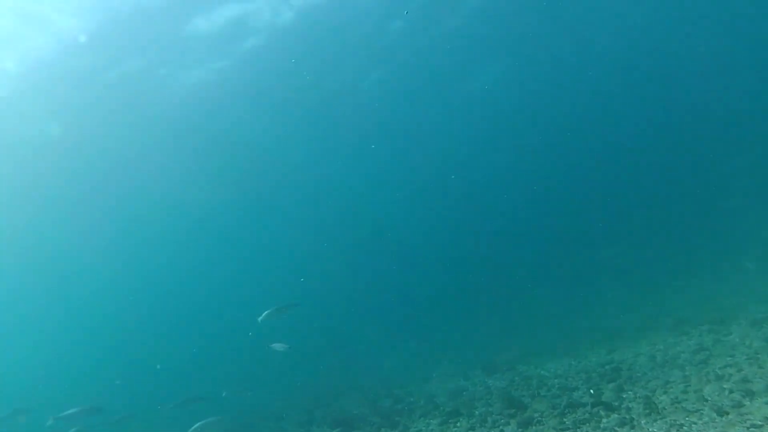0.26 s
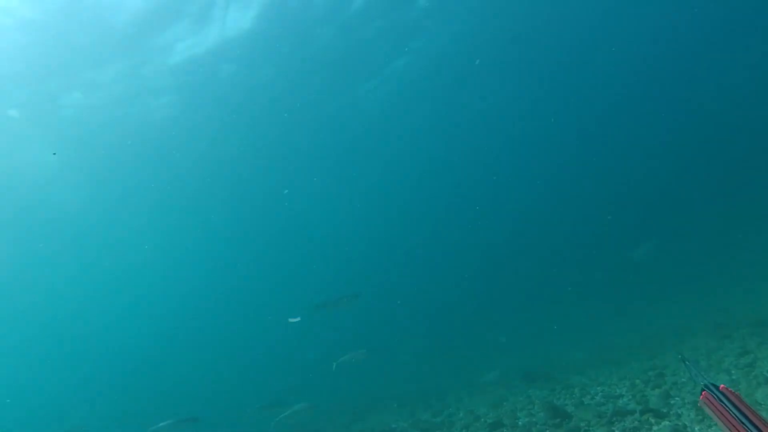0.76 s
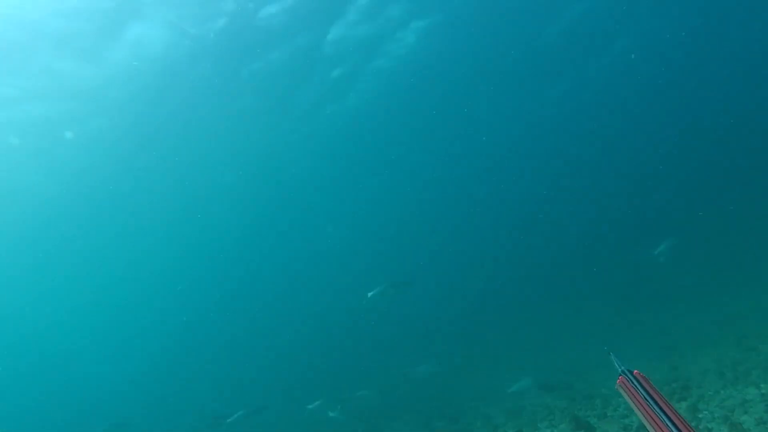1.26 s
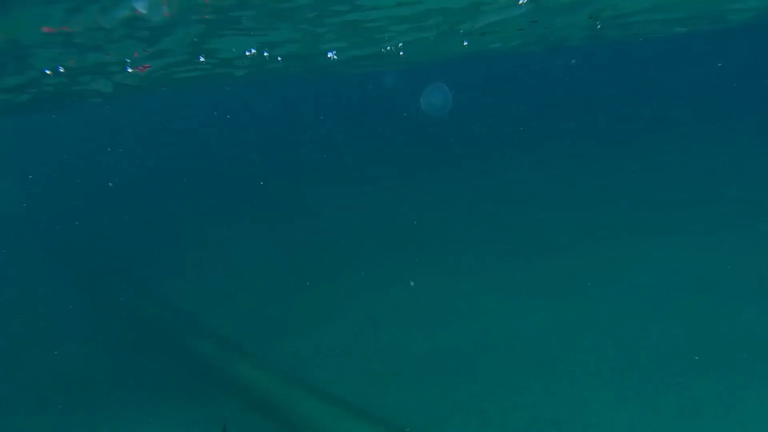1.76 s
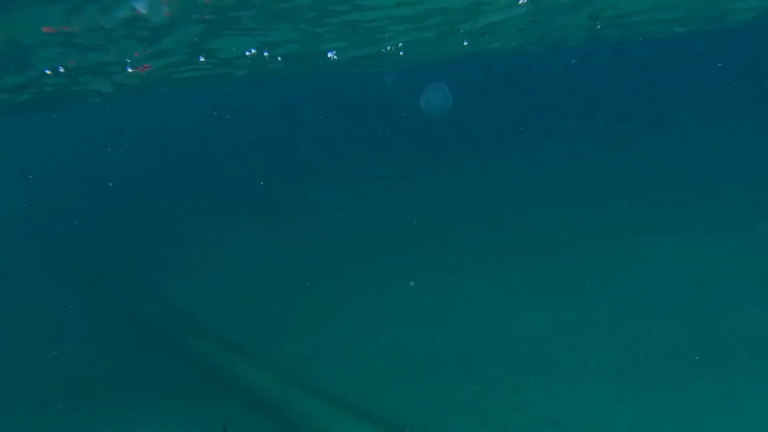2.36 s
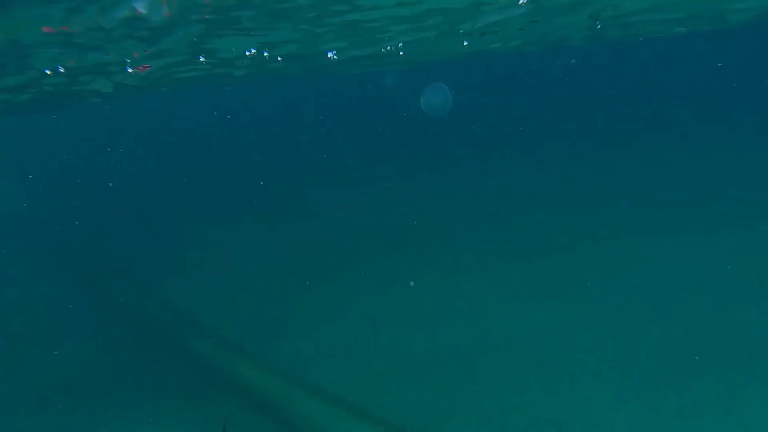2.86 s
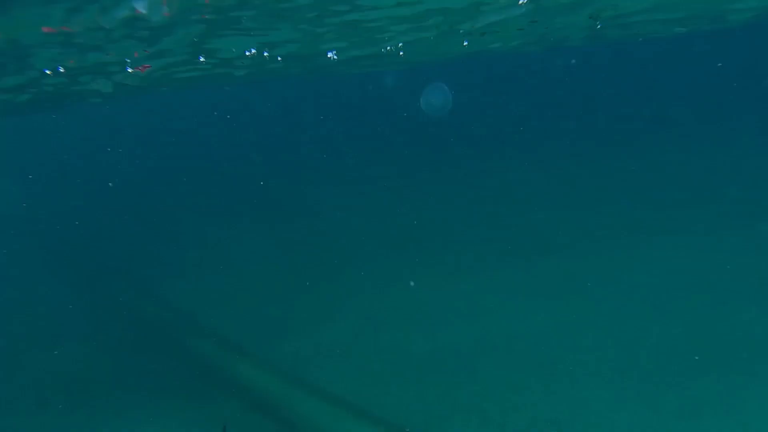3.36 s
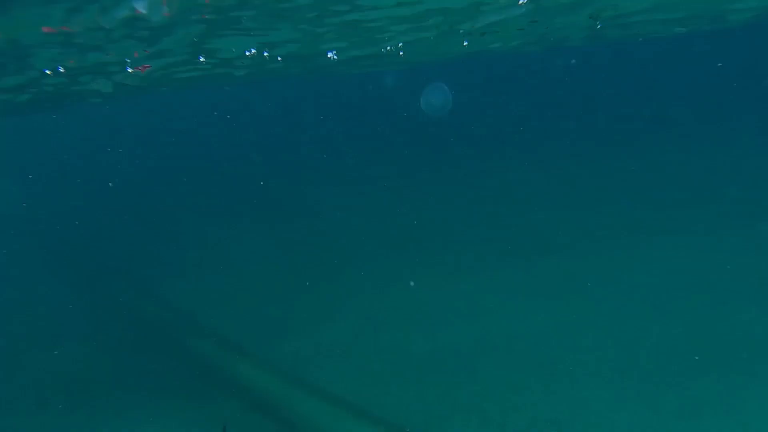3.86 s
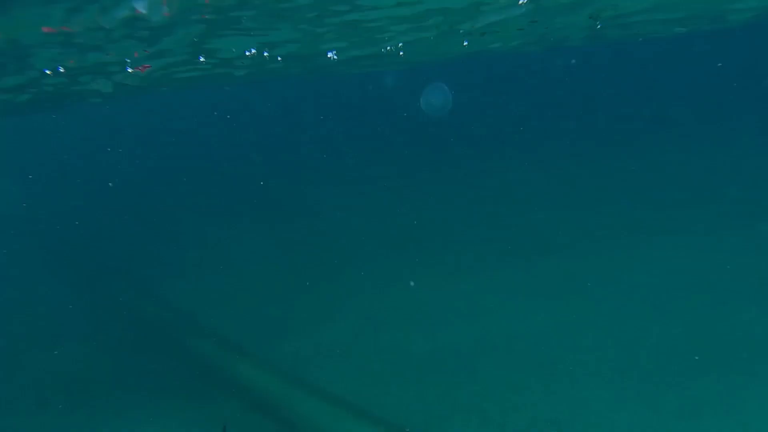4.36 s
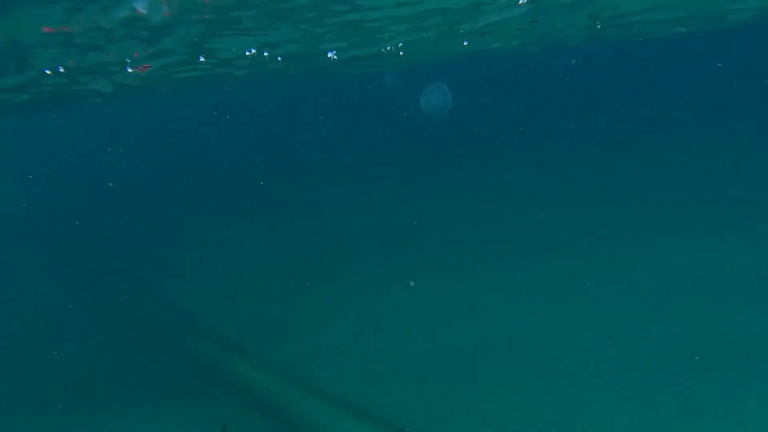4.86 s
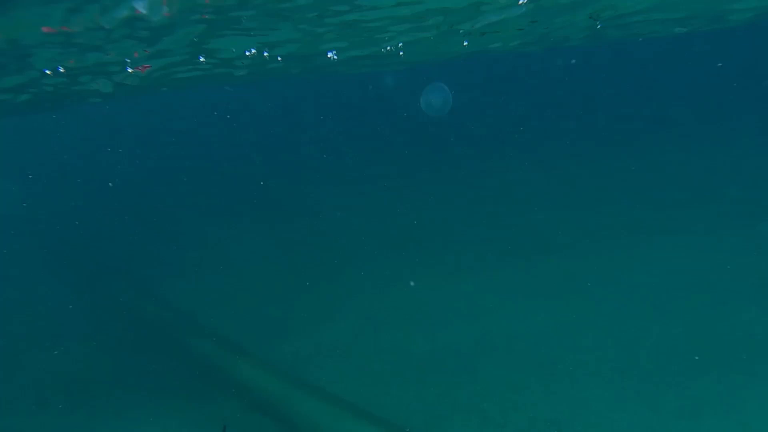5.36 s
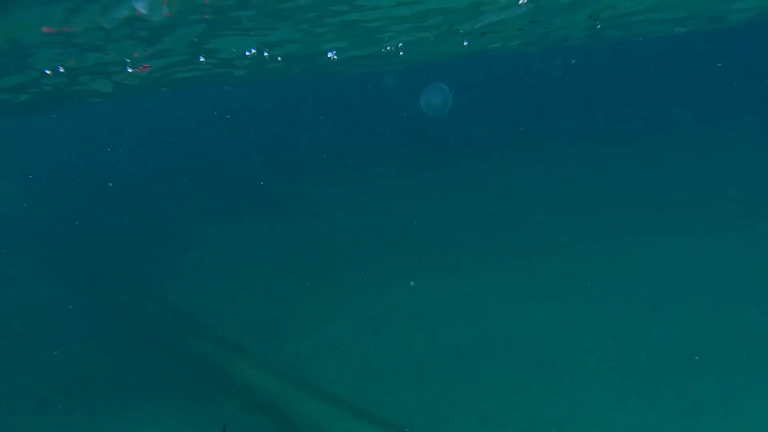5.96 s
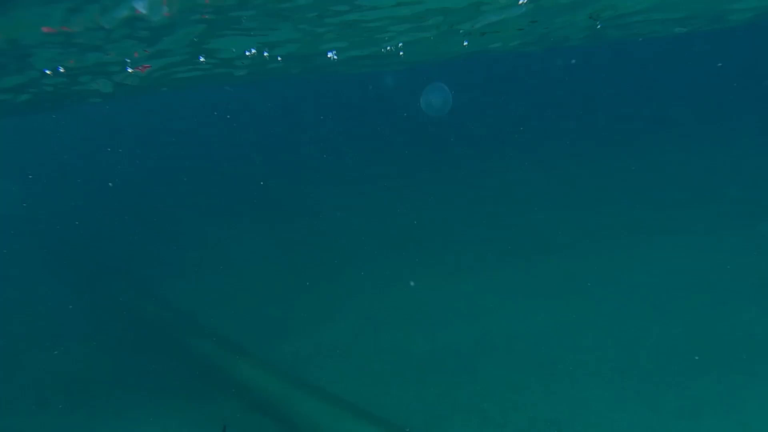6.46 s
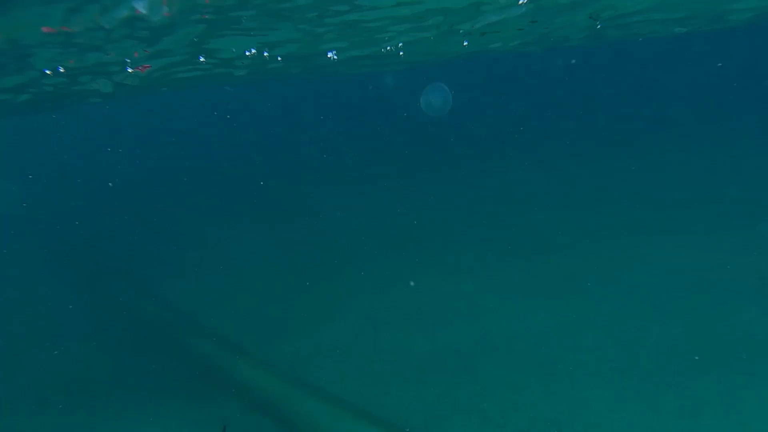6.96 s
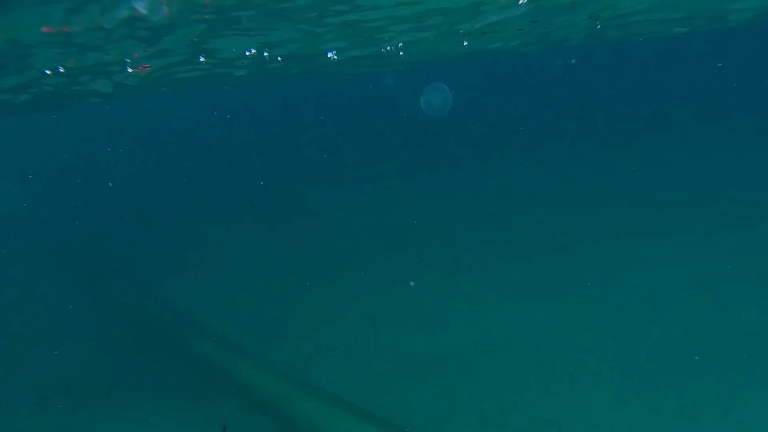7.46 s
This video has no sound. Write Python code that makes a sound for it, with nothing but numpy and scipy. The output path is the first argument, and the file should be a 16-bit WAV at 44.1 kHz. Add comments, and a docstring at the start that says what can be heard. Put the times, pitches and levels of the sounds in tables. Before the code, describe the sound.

Underwater, a microphone in a sealed housing picks up the continuous ringing drone of far-off boat traffic over a deep, wavering water rumble. After a split-second gap near the start, the drone carries on unchanged. Small, sharp shrimp clicks are scattered throughout, the loudest pair coming about two thirds of the way in. A very faint, high electronic whine sits behind everything.

```python
"""A sealed camera housing hangs under water while boats run far off. From the start, their propeller
roar rings the housing as a steady drone; engine hum and the surge of the water rumble below it,
snapping shrimp tick now and then, and the electronics whine faintly. At about 1.5 seconds the sound
dips to silence for an instant and comes back. The loudest snaps fall near 5 seconds, and the drone
carries on to the end."""
import sys
import numpy as np
from scipy import signal
from scipy.fft import rfft, irfft, next_fast_len
from scipy.io import wavfile
from scipy.ndimage import uniform_filter1d

SR = 44100
rng = np.random.default_rng(int(sys.argv[2]) if len(sys.argv) > 2 else 0)


def wrap_up_sound(samples):
    """Save the sound to the file named by the first command line argument, as 16-bit audio."""
    columns = np.atleast_2d(samples).T
    # keep every value between -1 and 1, then stretch to whole-number steps
    tamed = np.clip(columns, -1, 1)
    steps = np.round(tamed * 32767).astype(np.int16)
    wavfile.write(sys.argv[1], SR, steps)


N = 340011


def propellers():
    """Bubbles collapse at far propellers; their churning noise, with the crackle of snapping shrimp, makes the
    housing ring."""
    # The drone's slow drift. Each row: time in seconds, then the levels in dB of the low ring,
    # the middle ring, the shoulder just above it and the treble hiss.
    drift = [(0.0, -23, -24, -29.5, -50), (0.7, -23, -23, -28.5, -46.5), (1.4, -23.5, -22.5, -28.5, -47.5),
             (2.1, -24.5, -22.5, -29.5, -48), (2.7, -25, -23, -28.5, -47), (3.5, -24.5, -22.5, -29, -48),
             (3.9, -27, -23, -30.5, -50.5), (4.6, -24, -24.5, -32, -52), (5.1, -25.5, -25, -32, -49),
             (5.7, -23.5, -24, -34, -49.5), (6.4, -23.5, -24, -30, -49.5), (7.3, -24, -24, -27, -48.5),
             (7.71, -23, -23, -29.5, -49.5)]
    # Pitches at which the housing rings. Each row: pitch in Hz, width in Hz, relative level in dB.
    low_modes = [(271, 125, -32), (425.4, 49, -21.5), (484, 41, -22), (627, 56, -13.5), (711.4, 79.4, -0.5),
                 (785, 58, -8.5), (1034.5, 74, -9), (1107.4, 63, -7)]
    mid_modes = [(1351, 85, -13.5), (1476, 113, -10), (1664, 83, -3.5), (1737, 73, -1)]
    shoulder_modes = [(1855, 120, 1), (2060, 136, -4.5), (2218, 120, -12.5), (2386, 107, -10.5),
                      (2564, 75, -18), (2800, 42, -24)]
    high_modes = [(3178, 207, 3), (3330, 250, -40), (4020, 300, -38.5), (4478, 194, 2), (4750, 150, -4),
                  (5647, 300, 1.5), (6230, 380, 2.5), (7890, 1200, -11.5), (8980, 1200, -11.5),
                  (10370, 700, -17), (11400, 660, -10.5), (12500, 920, -13.5), (14200, 1400, -10.5),
                  (15500, 1400, -17)]
    # Brief swells of the middle ring. Each row: time in seconds, extra dB, half-length in seconds.
    bursts = [(1.019, 6, 0.016), (2.747, 6, 0.0056), (3.104, 6, 0.008), (4.12, 8.5, 0.0096),
              (5.278, 10, 0.0095), (5.386, 9.5, 0.0091), (6.6, 5.5, 0.012)]
    flutter_db, pops_per_s = 1.3, 180
    t = np.arange(N) / SR
    low_db, mid_db, shoulder_db, high_db = curves(drift)
    burst_db = sum(db * np.exp(-((t - s) / half_length) ** 2) for s, db, half_length in bursts)
    roar = rng.standard_normal(N) * undb(flutter_db * wander(per_s=25))
    pop_db = 11.5 + 3.5 * np.minimum(rng.exponential(size=N), 3)  # mostly small, a few large
    pops = (rng.random(N) < pops_per_s / SR) * undb(pop_db)
    pops *= undb(3.5 * wander(per_s=14))  # the crackle comes in flurries
    groups = ((roar, low_modes, 1.6, low_db),
              (roar, mid_modes, 1.6, mid_db + burst_db),
              (rng.standard_normal(N), shoulder_modes, 1.7, shoulder_db + burst_db / 2),
              (roar + pops * np.sign(roar), high_modes, 1.8, high_db))
    drone = np.zeros(N)
    for noise, modes, steepness, db in groups:
        fluttering = noise * undb(flutter_db * wander(per_s=14))  # each group also flutters alone
        drone += undb(db) * unit(ring(fluttering, modes, steepness))
    return drone


def rumble():
    """Engines hum through the water in a few narrow bands while the swell pushes on the housing."""
    # The rumble's slow drift. Each row: time in seconds, then the levels in dB of the hum below
    # 80 Hz, the hum above 80 Hz and the water's surge.
    drift = [(0.0, -30, -31, -27), (0.9, -33, -33.5, -23), (1.6, -36.5, -32, -28), (2.3, -32.5, -32, -21),
             (3.2, -32.5, -32.5, -19.5), (4.3, -33, -33, -17), (4.9, -36, -33.5, -27),
             (5.5, -34, -31.5, -19), (6.3, -34.5, -33.5, -20.5), (7.1, -36.5, -30, -20.5),
             (7.71, -33, -28.5, -16.5)]
    # How those three layers waver. Each row: typical swing in dB, changes per second.
    wavers = [(2.1, 11), (2.73, 11), (1.1, 6)]
    # The bands of each layer. Each row: pitch in Hz, width in Hz, relative level in dB.
    low_hum = [(27.7, 22, -7.5), (45, 12.5, 2), (63.8, 19, -1)]
    upper_hum = [(91.3, 16.7, -3), (102.5, 10.7, 1), (120.8, 11, -1), (152.3, 14, -14.5), (169, 37, -23.5)]
    surge = [(5, 5.6, 0), (11, 2.8, -4.5)]
    out = np.zeros(N)
    layers = zip(curves(drift), wavers, (low_hum, upper_hum, surge), (1.8, 1.9, 2.2))
    for db, (waver_db, per_s), bands, steepness in layers:
        # the noise wavers first, so the ringing smooths every change
        noise = undb(waver_db * wander(per_s)) * rng.standard_normal(N)
        out += undb(db) * unit(ring(noise, bands, steepness))
    return out


def shrimp():
    """Each shrimp snap is a sharp crack and a short hiss that ring four groups of pitches."""
    # The snaps. Each row: start in seconds, then the peak levels in dB of the low ring,
    # the middle tick, the upper tick and the bright crack.
    snaps = [(0.1267, -42, -45, -33, -31), (0.369, -45, -36, -21.5, -31), (0.3758, -55, -50, -36, -48),
             (0.3824, -55, -50, -37, -48), (0.7412, -35, -35, -31, -43), (1.112, -34, -36, -34, -39),
             (1.1779, -36, -32, -30, -31), (1.7931, -39, -34, -30, -38), (2.209, -39, -40, -34, -34),
             (2.2581, -37, -31, -38, -46), (2.4798, -50, -37, -34, -37), (2.4865, -38, -33, -28, -30),
             (4.5917, -39, -35, -31, -35), (4.7485, -11.5, -23.5, -36, -48), (4.9316, -47, -35, -40, -46),
             (5.0077, -14, -25, -28, -42), (5.0107, -19, -18, -23, -9.5), (5.2788, -37, -30, -29, -31),
             (5.4088, -50, -45, -31, -40), (5.5681, -51, -40, -34, -35), (6.1193, -55, -45, -31, -37),
             (6.1368, -38, -38, -36, -35), (6.222, -37, -38, -32, -36), (6.2258, -45, -57, -57, -26)]
    # One list for each of those four parts. Each row: pitch in Hz, width in Hz, relative level in dB.
    snap_modes = [
        [(2790, 160, 0), (2350, 500, -7), (3300, 500, -10)],
        [(3900, 700, -2), (4700, 700, 0)],
        [(5700, 600, -2), (6300, 700, 0)],
        [(8600, 1400, -22), (10900, 800, 0), (12500, 1400, -5), (15000, 1200, -13)],
    ]
    hiss_gain, hiss_decay_s = .1, .0008
    t = np.arange(SR // 20) / SR
    crack = t == 0  # a single-sample blow
    out = np.zeros(N + len(t))
    for start_s, *peaks_db in snaps:
        start = int(start_s * SR)
        hiss = hiss_gain * rng.standard_normal(len(t)) * np.exp(-t / hiss_decay_s)
        for modes, db in zip(snap_modes, peaks_db):
            click = ring(crack + hiss, modes, steepness=1.8)
            out[start:start + len(t)] += undb(db) * click / np.abs(click).max()
    return out[:N]


def electronics():
    """The camera's electronics give off a faint, very high whine."""
    # The whine's steady tone. Each row: pitch in Hz, average (rms) level in dB.
    tones = [(14998, -72)]
    t = np.arange(N) / SR
    return sum(np.sqrt(2) * undb(db) * np.sin(2 * np.pi * hz * t) for hz, db in tones)


def ring(x, modes, steepness):
    """Make x ring at the given pitches; more steepness lets less through between them."""
    size = next_fast_len(len(x) + min(len(x), SR))
    f = np.arange(size // 2 + 1) * SR / size + 1e-3
    power = sum(undb(2 * db) / (1 + ((f - hz ** 2 / f) / width) ** 2) ** steepness
                for hz, width, db in modes)
    # fold the filter to minimum phase, so the ringing comes after a blow and never before it
    cepstrum = irfft(.5 * np.log(power + 1e-14), size)
    cepstrum[1:size // 2] *= 2
    cepstrum[size // 2 + 1:] = 0
    response = np.exp(rfft(cepstrum))
    return irfft(rfft(x, size) * response, size)[:len(x)]


def wander(per_s):
    """A smooth random curve, about 1 in size, that heads for a new value per_s times a second."""
    hold = int(SR / per_s)
    steps = np.repeat(rng.standard_normal(N // hold + 1), hold)[:N]
    return unit(uniform_filter1d(uniform_filter1d(steps, hold), hold))


def curves(rows):
    """Join rows of a time and its values with straight lines, giving one curve for each value."""
    times, *columns = np.transpose(rows)
    return [np.interp(np.arange(N) / SR, times, column) for column in columns]


def undb(db):
    """Turn decibels into a number to multiply by."""
    return 10 ** (np.asarray(db) / 20)


def unit(x):
    """Scale x to an average (rms) level of 1."""
    return x / np.sqrt(np.mean(x ** 2))


def scene():
    """Everything that reaches the microphone inside the housing, in one channel."""
    return (propellers() + rumble() + shrimp())[None]


def record(dry):
    """Add the whine, dip briefly to silence once, and cut off the highest treble."""
    dip_at_s, fade_s, top_hz = 1.542, 0.037, 15750
    t = np.arange(N) / SR
    dip = np.clip(np.abs(t - dip_at_s) / fade_s, 0, 1) ** 1.75
    treble_cut = signal.ellip(12, .2, 80, top_hz, fs=SR, output="sos")
    return signal.sosfilt(treble_cut, (dry + electronics()) * dip)


dry = scene()
out = record(dry)
wrap_up_sound(out)
```